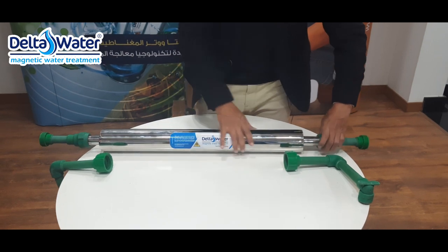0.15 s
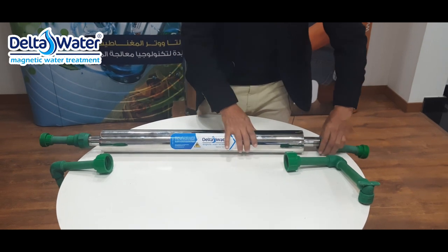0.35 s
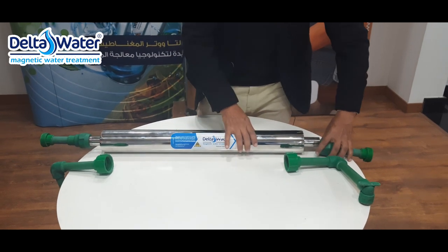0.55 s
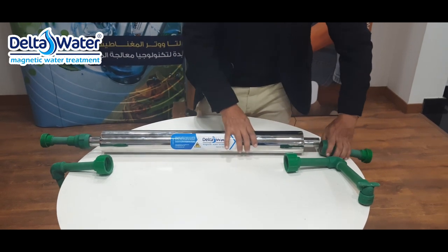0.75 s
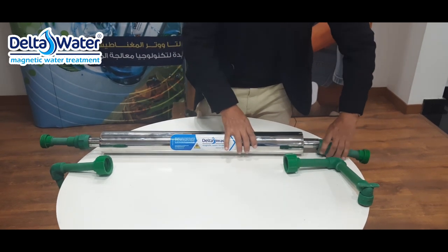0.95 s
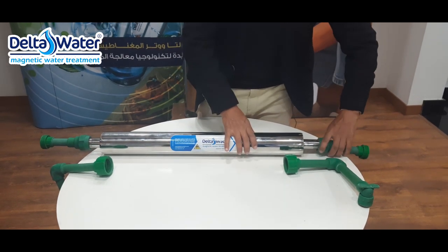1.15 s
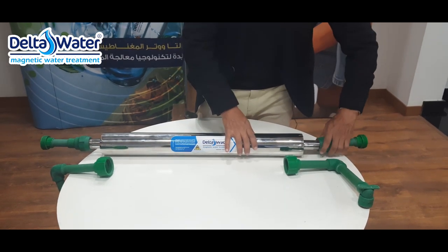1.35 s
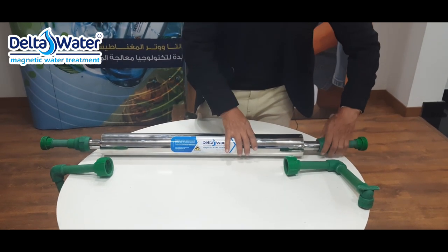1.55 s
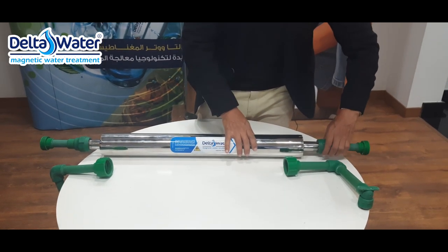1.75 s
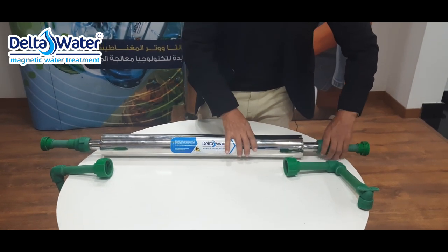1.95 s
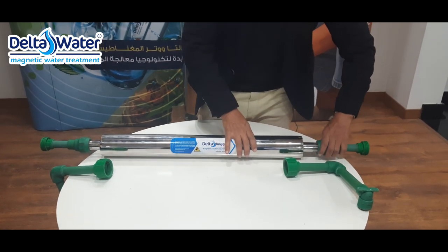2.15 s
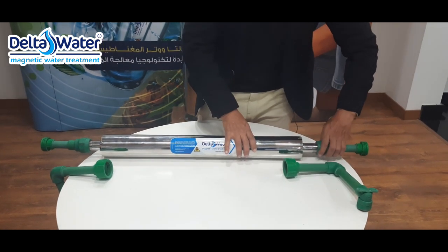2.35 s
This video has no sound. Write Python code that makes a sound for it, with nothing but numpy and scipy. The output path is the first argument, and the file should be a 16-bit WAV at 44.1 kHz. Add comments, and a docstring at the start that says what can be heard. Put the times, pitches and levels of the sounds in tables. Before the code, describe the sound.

Hard plastic clicks on a metal tube end, and the tube knocks the tabletop in quick rebounds; clusters come early and mid-way, then sparse light ticks, heard from a little distance in a reverberant room with low rumble.

```python
"""Threaded sleeve against a steel tube

A threaded plastic sleeve is offered up to a steel tube lying on a table, in a bare, lively room.
Its clicks on the rim and the tube's knocks on the table are impulses shaped by resonant modes.
The sleeve scrapes in dense random slips and squeaks in the thread as a wavering sine.
Cloth and skin brush softly as swelling noise, over a rumble, hiss, low hum and dying reverberation."""
import sys
import numpy as np
from scipy import signal
from scipy.fft import rfft, irfft
from scipy.io import wavfile

SR = 44100
rng = np.random.default_rng(int(sys.argv[2]) if len(sys.argv) > 2 else 0)


def unload_wav(signal):
    """Save mono or channel-first audio to the path in sys.argv[1] as 16-bit WAV at rate SR, clipped to [-1, 1]."""
    wavfile.write(
        sys.argv[1],
        SR,
        np.round(np.clip(np.atleast_2d(signal).T, -1, 1) * 32767).astype(np.int16),
    )


N = 110250  # samples, 2.5 s

# Centres of the six bands in which a click is specified: (frequency [Hz])
CLICK_BANDS_HZ = [350, 800, 1800, 2900, 4900, 7300]
# Sleeve on the rim: (time [s], six band levels [dB], room send [dB],
# ring favoured by the contact point [Hz], its lift [dB])
CLICKS = [ (0.2062, 11, 17.5, 19, 21, 0.5, 16, -0.5, 3550, 4.5),
          (.5419, 17.5, 14, 12, 13, 11, 2.5, -2, 2830, 9.2),
          (1.0213, -3.5, 6.5, 7, -1, -19, -11, 0.5, 2900, 3),
          (1.0287, 4, 13.5, 12.5, 13, 2.5, 5, -3, 4080, 11.6),
          (1.0368, 5, 10.5, 14, 0, -4, -5, 0.5, 5800, 11), (1.1768, 9, 15, 12, -0.5, -7, -1.5, -1, 7000, 4),
          (1.1817, 14.5, 10, 8.5, -2, -3.5, 4, 0, 7550, 5.4),
          (1.3459, 7, 6, 9.5, -3, -19, -4.5, -4.5, 2430, 5.7),
          (1.6820, -6, -6, -12, -26, -26.5, -28, 0, 2030, 2.6),
          (1.7667, 4.5, 9.5, 11.5, 10, 3, 11.5, 0.5, 5020, 11.7), ]
# Spectrum that every click shares: (frequency [Hz], level [dB])
CLICK_COLOUR = [(50, -26), (140, -0.5), (220, -8.5), (280, 2), (560, -4), (1100, -5.5), (1500, -5),
                (3600, 1), (4000, -5.5), (4700, -1.5), (5400, -7.5), (6800, 0.5), (9000, -11.5),
                (11000, -28), (16000, -41)]
# Modes of the sleeve and tube end: (frequency [Hz], width [Hz], lift [dB])
FITTING_MODES = [(282.8, 7.3, 12.5), (348, 22, 6), (431, 25, 11.5), (697, 37, 7), (803, 31, 10),
                 (1299, 43, 5), (1410, 20, 10), (1651.5, 10, 7.5), (1675, 16, 7.5), (2040, 34, 8.5),
                 (2825, 79, 3), (3062, 70, 4.5), (3550, 60, 1.5), (4826, 132, 9), (5800, 130, 10)]
CONTACT_RING_WIDTH_HZ = 154
CLICK_RING_DB, CLICK_T60_S = 6, 0.0163  # of the ring before its spectrum is evened out


def clicks(size=8192):
    """Modal excitation: each tap on the rim favours modes by contact point; returns direct sound and room send."""
    hz = np.fft.rfftfreq(size, 1 / SR)
    fitting_db = along(CLICK_COLOUR, hz) + lift(FITTING_MODES, hz)
    direct = sent = 0
    for start, *levels_db, send_db, ring_hz, ring_db in CLICKS:
        bands_db = along(list(zip(CLICK_BANDS_HZ, levels_db)), hz)
        contact_db = bands_db + lift([(ring_hz, CONTACT_RING_WIDTH_HZ, ring_db)], hz)
        tap = blow(start, contact_db + fitting_db, scatter(CLICK_RING_DB, CLICK_T60_S))
        direct = direct + tap
        sent = sent + undb(send_db) * tap
    return direct, sent


# Centres of the four bands in which a knock is specified: (frequency [Hz])
KNOCK_BANDS_HZ = [150, 380, 1100, 5500]
# Tube on the table, with its rebounds: (time [s], four band levels [dB])
KNOCKS = [ (0.3472, 24, 36, 25.5, 1), (.3520, 25, -14, 27.5, 5), (.3680, 7.5, 29, 16, -7),
          (.3770, 22, 19.5, 19.5, -8), (0.386, 12.5, 16, 6, -8), (0.414, 7, 18, 15.5, -30),
          (0.725, 8.5, 28, 11, -5), (0.7288, 10, 24.5, 17, -13.5), (.7370, 1.5, 22, 9.5, -9.5),
          (0.7495, 12, 20.5, 9.5, -17), (0.766, -4, 3, -6.5, -38), (.7970, -3, -22, 11, -23),
          (1.029, 13.5, -3.5, -5, 0), (1.32, 0, 10.5, 5, -52), (1.3520, -16.5, 15, 8, -12),
          (1.3680, -3, -3, 3, -28), (1.7640, 7, 12, -30, -15), (1.9550, 1, 8, -15, -32),
          (2.308, 9.5, -4, -13.5, -36), (2.4790, 9, 9.5, 4, -22), ]
# Spectrum that every knock shares: (frequency [Hz], level [dB])
KNOCK_COLOUR = [(30, -31), (70, -7.5), (130, 2.5), (250, -1.5), (320, -1.5), (700, -5), (1100, -6),
                (1700, -7), (4000, -5), (8000, -4.5), (11000, -20.5), (16000, -35)]
# Modes of the tube and table top: (frequency [Hz], width [Hz], lift [dB])
TABLE_MODES = [(136, 30, 2.5), (204, 17, 3), (308, 23, 6), (421.4, 12, 3), (462.5, 12.5, 6),
               (549, 10, -0.5), (1012, 15, 2), (1180, 39, 7), (1220, 71, 4), (1434, 21, 5.5),
               (1613, 11, 2.5), (2100, 150, 6.5)]
KNOCK_RING_DB, KNOCK_T60_S = 7.5, 0.0227  # of the ring before its spectrum is evened out
KNOCK_ROOM_DB = -2  # room send


def knocks(size=8192):
    """Impact and rebound: the tube drops and rocks, each contact exciting the modes of tube and table."""
    hz = np.fft.rfftfreq(size, 1 / SR)
    table_db = along(KNOCK_COLOUR, hz) + lift(TABLE_MODES, hz)
    out = 0
    for start, *levels_db in KNOCKS:
        bands_db = along(list(zip(KNOCK_BANDS_HZ, levels_db)), hz)
        out = out + blow(start, bands_db + table_db, scatter(KNOCK_RING_DB, KNOCK_T60_S))
    return out


# Sleeve sliding on the rim: (end time [s], build-up [s], level [dB])
SCRAPES = [(0.201, 0.029, -25), (1.175, 0.023, -33), (1.371, 0.047, -32.5), (1.765, 0.023, -24)]
# Spectrum of the slips: (frequency [Hz], level [dB])
SCRAPE_COLOUR = [(60, -15.5), (200, -6), (330, 2.5), (800, -2), (1100, -15), (2000, -12), (4000, -35),
                 (7000, -21.5), (10000, -38), (16000, -60)]
SCRAPE_GRAINS_PER_S, SCRAPE_RELEASE_S = 4800, 0.0043  # mean slip rate, decay time constant


def scrapes():
    """Dry friction: dense random slips build up exponentially until the sleeve snaps over the rim."""
    t = times()
    grains = rng.standard_normal(N) * (rng.random(N) < SCRAPE_GRAINS_PER_S / SR)
    slips = tint(grains, SCRAPE_COLOUR)
    swell = 0
    for end, build, db in SCRAPES:
        decay = np.maximum(2 * (end - t) / build, (t - end) / SCRAPE_RELEASE_S)
        swell = swell + undb(db) * np.exp(-decay)
    return slips * swell


# Thread squeaks: (start time [s], attack [s], hold [s], release [s], pitch [Hz], level [dB])
SQUEAKS = [ (.2070, 0.00074, 0.0032, 0.0022, 6970, -22.5), (0.402, 0.046, 0.0097, 0.017, 6790, -32),
           (0.5418, 0.0012, .004, 0.0037, 7020, -36), (1.0197, 0.00069, 0.0088, .002, 6750, -45),
           (1.028, 0.0014, 0.0054, .002, 6783, -17.5), ]
SQUEAK_WOBBLE, SQUEAK_WOBBLE_PER_S = 0.0087, 330  # rms pitch deviation as a fraction, its corner in Hz
SQUEAK_ROOM_DB = -4  # room send


def squeaks():
    """Stick-slip oscillation: friction in the thread drives one high, slightly unsteady mode."""
    t, out = times(), 0
    corner = SQUEAK_WOBBLE_PER_S
    wobble = tint(rng.standard_normal(N), [(corner, 0), (2 * corner, -40)])
    for start, attack, hold, release, hz, db in SQUEAKS:
        age = t - start
        rise = np.clip(age / attack, 0, 1) ** 2
        envelope = rise * np.exp(-np.maximum(age - attack - hold, 0) / release)
        phase = 2 * np.pi * np.cumsum(hz * (1 + SQUEAK_WOBBLE * wobble)) / SR
        out = out + undb(db) * envelope * np.sqrt(2) * np.sin(phase)
    return out


# Cloth and skin brushing: (centre time [s], half length to 1/e [s], level [dB])
RUSTLES = [(0.045, 0.064, -48.5), (0.16, 0.058, -50.5), (2.262, 0.013, -54)]
# Spectrum of the brushing: (frequency [Hz], level [dB])
RUSTLE_COLOUR = [(300, 2), (2000, 1.5), (4500, -2), (6500, -4), (8000, 3.5), (12000, -9), (16000, -18)]


def rustles():
    """Broadband friction noise: brushing cloth and skin swell and fade along Gaussian envelopes."""
    t = times()
    swell = sum(undb(db) * np.exp(-((t - centre) / half) ** 2) for centre, half, db in RUSTLES)
    return swell * tint(rng.standard_normal(N), RUSTLE_COLOUR)


# Diffuse reverberation: (frequency [Hz], level against direct sound [dB], t60 [s])
ROOM = [(100, 2.5, 0.61), (350, 1, 0.52), (860, 1.5, 0.65), (1350, 3.5, 0.99), (2900, -5, 1),
        (5170, -7.5, 1), (7000, -12.5, 0.86), (12100, -2.5, 0.71)]
ROOM_ONSET_S = 0.0098  # ramp over the whole response
EARLY_DB, EARLY_T60_S = -3, 0.064  # near reflections, before the ramp


def room(x):
    """Reverberation as convolution: near reflections, then a diffuse tail decaying band by band."""
    hz = np.fft.rfftfreq(N, 1 / SR)
    noise = rfft(rng.standard_normal(N))
    response = undb(EARLY_DB) * tail(EARLY_T60_S)
    for k, (_, db, t60) in enumerate(ROOM):
        # each band crossfades into its neighbours
        share = along([(row[0], j == k) for j, row in enumerate(ROOM)], hz)
        envelope = fade(t60)
        band = irfft(noise * share, N) * envelope / np.linalg.norm(envelope)
        response = response + undb(db) * band
    return convolve(x, response * np.clip(times() / ROOM_ONSET_S, 0, 1) ** 2)


# Spectrum of the room rumble and hiss: (frequency [Hz], level [dB])
FLOOR = [(15, -20), (25, -0.5), (80, 0), (354, -11.5), (476, -11.5), (560, -18.5), (818, -16), (936, -14),
         (1100, -19.5), (1740, -22), (4250, -32.5), (8360, -32), (16000, -41.5)]
FLOOR_DB = -51.5  # rms
# Low room hum: (frequency [Hz], rms level [dB])
HUM = [(50.5, -58.5), (86.5, -55.5)]
# Spectrum of the room still ringing from earlier handling: (frequency [Hz], level [dB])
LINGER_COLOUR = [(40, 4.5), (90, -2), (200, 1.5), (300, 2.5), (500, -12), (800, -6), (2000, -5),
                 (3200, -22.5), (5000, -74), (12000, -47.5)]
LINGER_DB, LINGER_T60_S = -40.5, 0.87  # level at the start, decay


def background():
    """Superposition: steady rumble and hiss, low hum tones, and exponentially dying reverberation."""
    t, hum = times(), 0
    for hz, db in HUM:
        hum = hum + undb(db) * np.sqrt(2) * np.sin(2 * np.pi * (hz * t + rng.random()))
    linger = undb(LINGER_DB) * fade(LINGER_T60_S) * tint(rng.standard_normal(N), LINGER_COLOUR)
    floor = undb(FLOOR_DB) * tint(rng.standard_normal(N), FLOOR)
    return floor + hum + linger


def blow(start, spectrum_db, spread):
    """Minimum-phase impulse: a causal strike of given spectrum, spread in time and placed at its start."""
    # folding the cepstrum gives the minimum-phase pulse
    cepstrum = irfft(np.log(undb(spectrum_db)))
    half = len(cepstrum) // 2
    cepstrum[1:half] *= 2
    cepstrum[half + 1:] = 0
    strike = irfft(np.exp(rfft(cepstrum)) * rfft(spread, len(cepstrum)))
    return np.pad(strike, (int(start * SR), N))[:N]


def lift(modes, hz):
    """Resonance: each mode raises the spectrum by a bell-shaped power gain; returns the sum in dB."""
    total_db = 0
    for centre, width, db in modes:
        bell = 1 / (1 + (2 * (hz - centre) / width) ** 2)
        total_db = total_db + 10 * np.log10(1 + (undb(db) ** 2 - 1) * bell)
    return total_db


def scatter(ring_db, t60, size=4096, count=6):
    """Near-allpass dispersion: a crack and dense short ring, evened out to spread a blow with little colour."""
    y = undb(ring_db) * tail(t60, size=size)
    y[0] += 1
    for _ in range(count):
        # flatten the magnitude, then cut the response to the first half
        y = irfft(np.exp(1j * np.angle(rfft(y))))
        y[size // 2:] = 0
    return y


def tail(t60, size=N):
    """Diffuse decay: exponentially fading noise of unit energy."""
    y = rng.standard_normal(size) * fade(t60, size=size)
    return y / np.linalg.norm(y)


def fade(t60, size=N):
    """Exponential decay: amplitude falls by 60 dB in t60 seconds."""
    return np.exp(-np.log(1000) * np.arange(size) / SR / max(t60, 1e-3))


def tint(x, colour):
    """Linear filtering: colour a signal in the frequency domain and bring it to rms 1."""
    y = irfft(rfft(x) * undb(along(colour, np.fft.rfftfreq(N, 1 / SR))), N)
    return y / np.std(y)


def convolve(a, b):
    """Convolution: pass a sound through an impulse response."""
    return signal.fftconvolve(a, b)[:N]


def along(points, hz):
    """Logarithmic pitch scale: interpolate (frequency [Hz], value) points on a log-frequency axis."""
    f, v = np.array(points, float).T
    return np.interp(np.log(np.maximum(hz, 1)), np.log(f), v)


def undb(db):
    """Logarithmic level: decibels to amplitude gain."""
    return 10 ** (np.asarray(db) / 20)


def times():
    """Uniform sampling: time of every sample in seconds."""
    return np.arange(N) / SR


def scene():
    """Superposition: direct sources, their reverberation, rustles and background add linearly."""
    click, click_sent = clicks()
    knock, scrape, squeak = knocks(), scrapes(), squeaks()
    sent = click_sent + undb(KNOCK_ROOM_DB) * knock + scrape + undb(SQUEAK_ROOM_DB) * squeak
    direct = click + knock + scrape + squeak
    return (direct + room(sent) + rustles() + background())[None]


TOP_HZ = 16200  # upper band limit


def record(dry):
    """Saturation and band limiting: the recorder clips at full scale, then a steep low-pass cuts the top."""
    clipped = np.clip(dry, -1, 1)
    low_pass = signal.ellip(10, .2, 80, TOP_HZ, fs=SR, output="sos")
    return signal.sosfilt(low_pass, clipped)


dry = scene()
out = record(dry)
unload_wav(out)
```